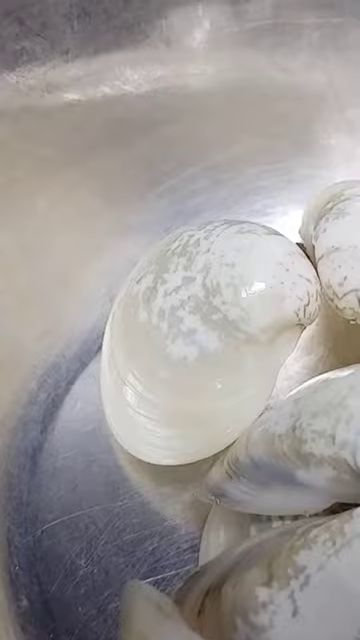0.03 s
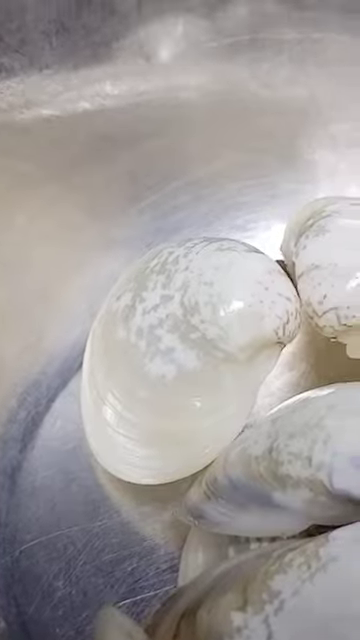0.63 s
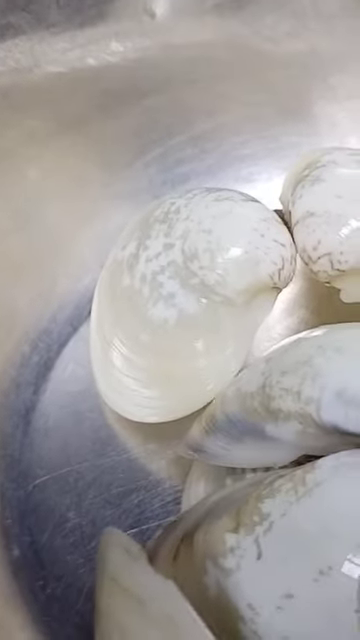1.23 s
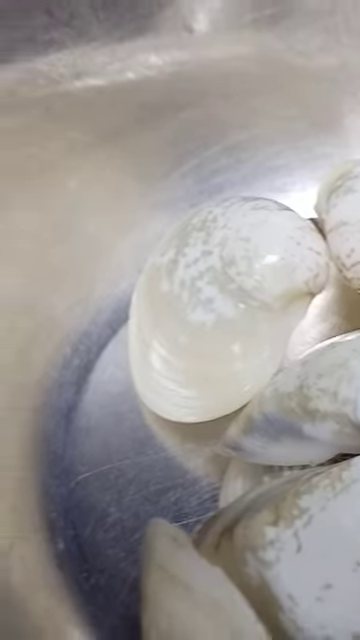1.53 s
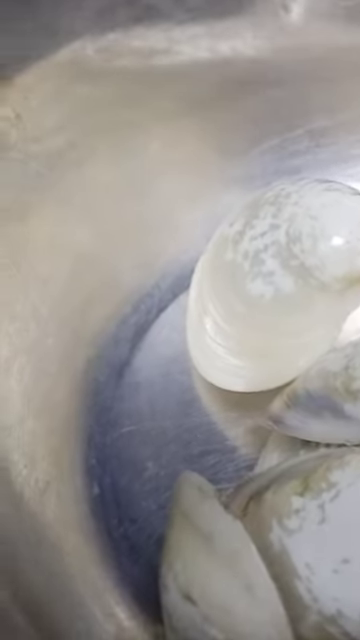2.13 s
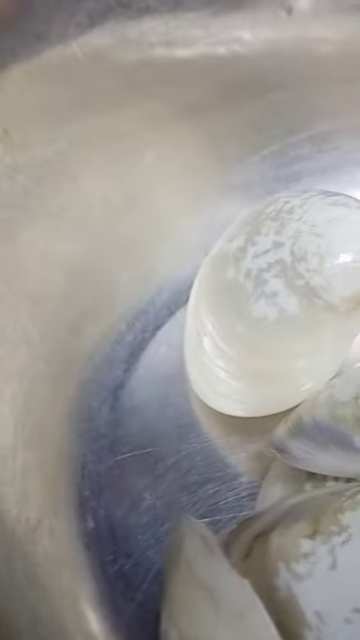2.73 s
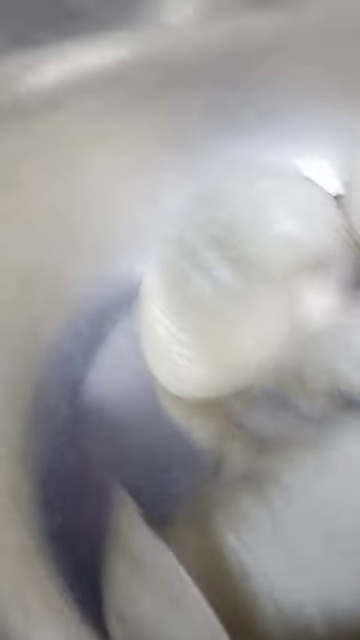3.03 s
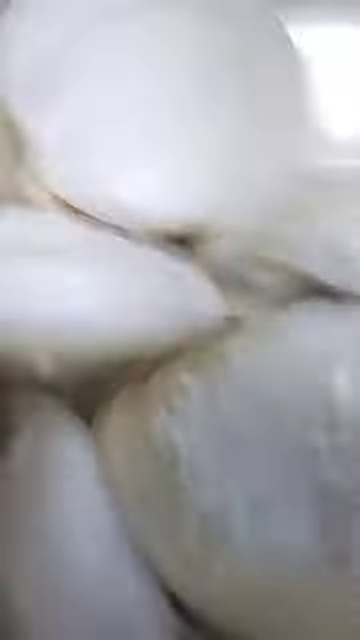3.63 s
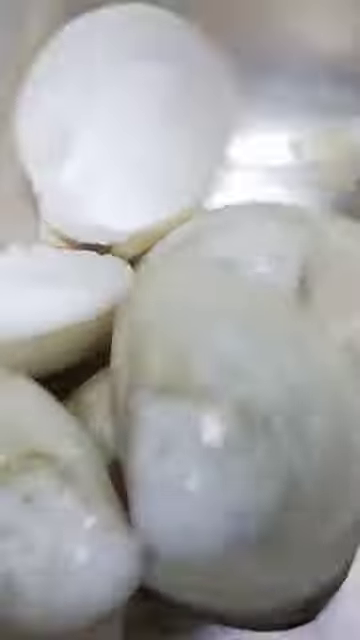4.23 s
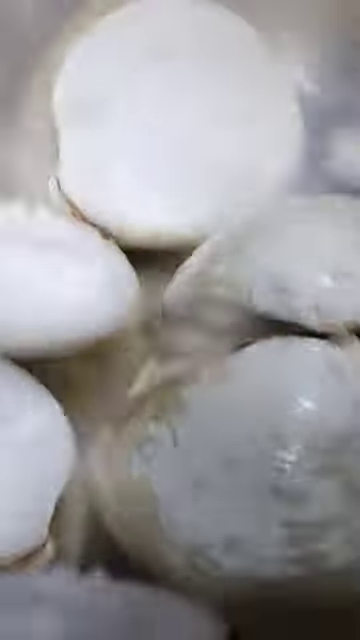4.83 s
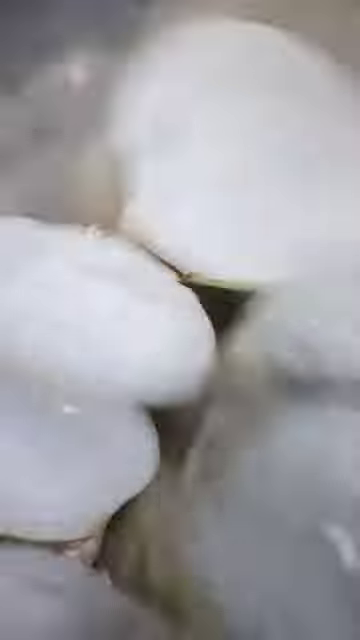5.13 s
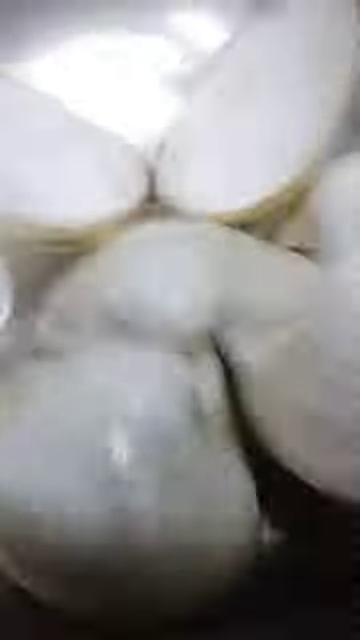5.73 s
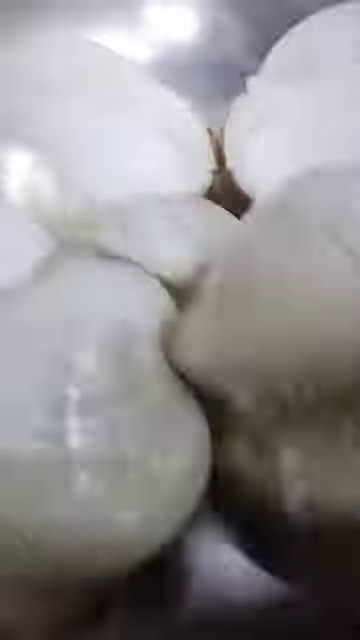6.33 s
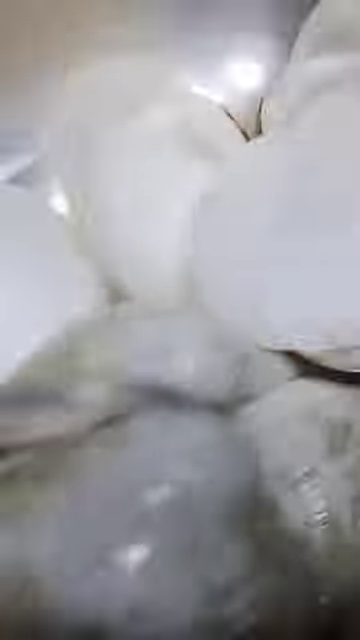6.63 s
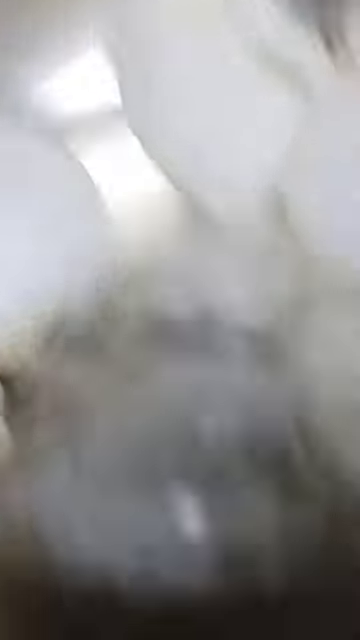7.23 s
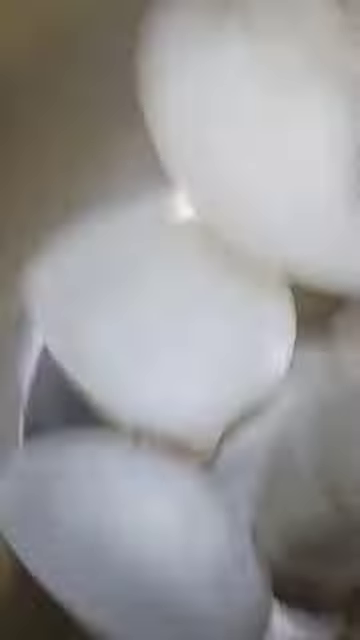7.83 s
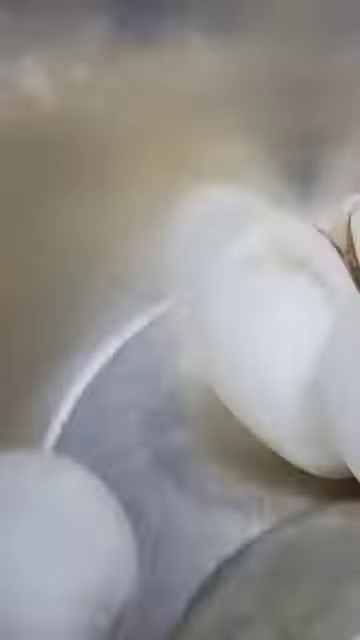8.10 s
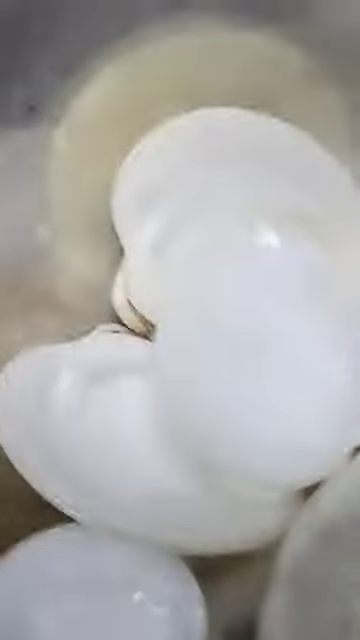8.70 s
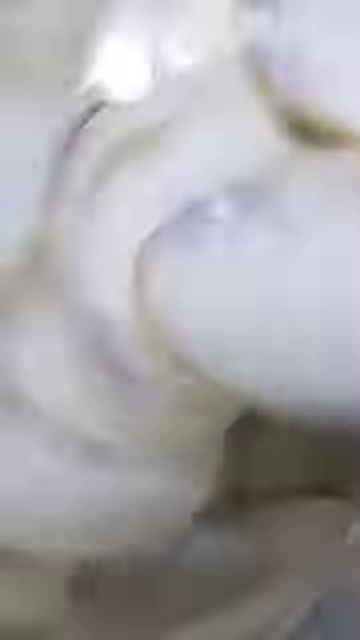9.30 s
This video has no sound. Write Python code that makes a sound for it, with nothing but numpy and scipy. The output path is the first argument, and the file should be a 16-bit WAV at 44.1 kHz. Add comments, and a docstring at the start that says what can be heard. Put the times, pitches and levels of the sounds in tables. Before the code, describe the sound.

Clam shells clatter close up in a steel bowl, knocked, swirled and tossed three times in a small room.

```python
"""Clam shells clatter in a steel bowl: a few taps and a knock, four seconds of swirling, three tosses,
then more swirling. Hundreds of contacts a second ring the shells and the loaded, well damped bowl,
close to a two-port microphone. Fingers brush the steel as the bowl is taken up; each toss pushes
a puff of air. Behind it, in a small, hard room, a clock ticks and an appliance hums faintly."""
import sys
import numpy as np
from scipy import signal
from scipy.fft import rfft, irfft, next_fast_len
from scipy.io import wavfile
from scipy.ndimage import uniform_filter1d

SR = 44100
rng = np.random.default_rng(int(sys.argv[2]) if len(sys.argv) > 2 else 0)


def dump_mix(stems):
    """Bounce the given channels to the path in sys.argv[1] as a 16-bit WAV at rate SR."""
    frames = np.atleast_2d(stems).T  # one column per channel
    limited = np.clip(frames, -1, 1)  # hard clip at full scale
    pcm = np.round(limited * 32767).astype(np.int16)
    wavfile.write(sys.argv[1], SR, pcm)


N = 421596

# Throws of the heap. Each row: start in s, rise in s, top clatter in dB, flight in s,
# landing clatter in dB, air puff in dB.
TOSSES = [(7.478, 0.032, -12.5, .125, -20, -42), (7.902, 0.086, -12, 0.16, -16, -42.5),
          (8.41, 0.073, -12.5, 0.13, -18, -34)]
ROLL_DB = -27.5  # effort of the rolling heap between slides


def amp(db):
    """Decibels to gain."""
    return 10 ** (np.asarray(db) / 20)


def unit(x):
    """x at rms 1."""
    return x / np.sqrt(np.mean(x ** 2) + 1e-20)


def along(points, hz):
    """Interpolate (Hz, value) points on a log axis."""
    f, v = np.transpose(points)
    return np.interp(np.log(hz + 1), np.log(f + 1), v)


def add(track, start_s, sound):
    """Mix a stereo sound into the track."""
    part = track[:, max(round(start_s * SR), 0):][:, :sound.shape[1]]
    part += sound[:, :part.shape[1]]


def filtered(x, response):
    """Apply the gain response(hz) to x."""
    size = next_fast_len(N + 8192, True)
    return irfft(rfft(x, size) * response(np.fft.rfftfreq(size, 1 / SR)), size)[..., :N]


def noise(spectrum):
    """Stereo noise of rms 1, coloured by (Hz, dB) points."""
    return unit(filtered(rng.standard_normal((2, N)), lambda hz: amp(along(spectrum, hz))))


def wobble(knots_per_s):
    """Random curve, linear between Gaussian knots."""
    knots = rng.standard_normal(int(N * knots_per_s / SR) + 2)
    return np.interp(np.arange(N) * knots_per_s / SR, np.arange(len(knots)), knots)


def min_phase_pulse(spectrum, size=1024):
    """The most compact pulse with this (Hz, dB) spectrum."""
    cepstrum = irfft(np.log(amp(along(spectrum, np.fft.rfftfreq(size, 1 / SR)))))
    cepstrum[1:size // 2] *= 2
    cepstrum[size // 2 + 1:] = 0
    return irfft(np.exp(rfft(cepstrum)))


def swells(peaks, spectrum, rise_s, t60_s):
    """Noise bursts that build to each (s, dB) peak and die away."""
    t = np.arange(N) / SR
    level = np.zeros(N)
    for peak_s, db in peaks:
        onset = np.exp(-np.clip((peak_s - t) / rise_s, 0, 10) ** 2)
        level += onset * amp(db - 60 * np.clip(t - peak_s, 0, 2) / t60_s)
    return level * noise(spectrum)


def background(hum_db=-7.5):
    """Room air with the faint hum of an appliance."""
    # Air level. Each row: time in s, level in dB.
    air_levels = [(0, -120), (.23, -120), (.25, -73.5), (.5, -66), (3.2, -63), (7.2, -71), (9, -74)]
    # Air colour. Each row: frequency in Hz, relative density in dB.
    air_spectrum = [(25, -9), (50, -6.5), (95, 0), (135, -19.5), (190, 0.5), (250, -11.5), (300, -6),
                    (400, -15), (900, -14), (1300, -21.5), (1600, -25.5), (3000, -36.5), (15000, -49)]
    # Appliance tones. Each row: frequency in Hz, relative level in dB.
    hum_tones = [(301.5, -75.5), (699.8, -79), (909.8, -82), (1001, -81.5), (1200, -91.5), (1303, -87)]
    t = np.arange(N) / SR
    hum = sum(amp(db) * np.sin(2 * np.pi * hz * t + rng.uniform(0, 2 * np.pi)) for hz, db in hum_tones)
    level = amp(np.interp(t, *np.transpose(air_levels)))
    return level * (noise(air_spectrum) + amp(hum_db) * unit(hum))


def clock():
    """Three soft ticks, a second apart."""
    # Ticks. Each row: time in s, level in dB.
    ticks = [(.592, -56.5), (1.595, -54), (2.595, -55.5)]
    # Tick colour. Each row: frequency in Hz, relative density in dB.
    spectrum = [(300, -16), (1200, -1), (2300, 4), (3900, 13.5), (6500, 0), (8500, -16), (15000, -23)]
    return swells(ticks, spectrum, rise_s=0.022, t60_s=0.29)


def finger_brushes():
    """Fingers slide on the steel with a thin hiss."""
    # Strokes. Each row: time in s, level in dB.
    strokes = [(1.85, -71), (2.21, -67), (2.41, -65), (2.53, -69)]
    # Friction colour. Each row: frequency in Hz, relative density in dB.
    spectrum = [(1000, -21), (5000, -25.5), (6200, -2), (9000, -16.5), (15000, -33)]
    return swells(strokes, spectrum, rise_s=0.02, t60_s=0.27)


def air_puffs(lag_s=0.027):
    """The tossed bowl pushes air: a low puff just after each throw."""
    # Puff colour. Each row: frequency in Hz, relative density in dB.
    spectrum = [(20, -14), (55, -12.5), (110, -10), (250, -11.5), (1000, -69)]
    peaks = [(start_s + rise_s + lag_s, db) for start_s, rise_s, *_, db in TOSSES]
    return swells(peaks, spectrum, rise_s=0.051, t60_s=0.22)


def in_room(x, wet_db, build_s=0.0017):
    """Close, hard walls add a short tail, drawn afresh on each call."""
    # Room decay. Each row: frequency in Hz, T60 in s.
    decay = [(200, 0.13), (600, 0.2), (3000, 0.25), (7000, 0.24), (14000, 0.18)]
    hz, t, spectra = signal.stft(rng.standard_normal((2, SR // 3)), SR, nperseg=256)
    tail = signal.istft(spectra * amp(-60 * t / along(decay, hz)[:, None]), SR, nperseg=256)[1]
    tail *= 1 - np.exp(-(np.arange(tail.shape[1]) / SR / build_s) ** 2)
    tail *= amp(wet_db) / np.linalg.norm(tail[0])
    tail[:, 0] += 1  # direct sound
    return signal.fftconvolve(x, tail, axes=1)


def ports(x):
    """Both ports hear the bowl's low modes together; the right gets more bass and top treble."""
    # Port likeness. Each row: frequency in Hz, left-right correlation.
    likeness = [(60, 0.68), (230, 0.49), (330, 0.56), (480, 0.7), (680, 0.35), (820, 0.42), (1050, -0.12),
                (1350, 0.12), (2000, 0.012), (15000, -0.027)]
    # Port balance. Each row: frequency in Hz, left minus right in dB.
    balance = [(60, -4.5), (400, -7), (800, -1), (1100, -4), (1900, 1.5), (2600, 3), (7900, -.5),
               (8400, -11), (15000, -11)]

    def mid_side_gains(hz):
        angle = np.arccos(np.clip(along(likeness, hz), -1, 1)) / 2
        return np.array([np.cos(angle), np.sin(angle)])

    mid, side = filtered(x, mid_side_gains)
    left_right = np.array([mid + side, mid - side])
    return filtered(left_right, lambda hz: amp(np.outer([.5, -.5], along(balance, hz))))


def ringing(modes, t):
    """Damped modes (Hz, width in Hz, peak in dB), each at its own phase in each port."""
    hz, width_hz, db = np.transpose(modes)[:, :, None]
    phase = rng.uniform(0, 2 * np.pi, (2, len(modes), 1))
    envelope = amp(db) * 2 * np.pi * width_hz / SR * np.exp(-np.pi * width_hz * t)
    return np.sum(envelope * np.sin(2 * np.pi * hz * t + phase), axis=1)


def contact(scrape_t60_s, shell_db, bowl_db, weight_db, sharp_db, own_modes=(), scatter_db=7.5):
    """One shell strikes: its ribbed edge scrapes; shell and bowl ring at strengths set by the spot hit."""
    # Bowl modes. Each row: frequency in Hz, width in Hz, relative peak in dB.
    bowl_modes = [(347.5, 42.3, 6), (661, 26, 4), (793, 120, -1), (1354, 52, 4.5), (1928, 44, 0),
                  (2294, 36, 4.5), (2728, 40, 9), (2983, 27, 4.5), (3627, 57, 7.5), (3835, 37, 9),
                  (4630, 42, 9), (4884, 49, 2), (5774, 38, 7.5), (7057, 57, 7.5), (7383, 61, 5),
                  (7774, 39, 10)]
    # Contact pulse. Each row: frequency in Hz, relative level in dB.
    spectrum = [(40, -29), (100, -18.5), (210, -18), (340, -16.5), (500, -8.5), (740, 2), (1200, -2),
                (1900, -1.5), (2400, -4), (3000, 0.5), (4600, -7), (6100, -5), (8800, -16), (13500, -17.5),
                (15500, -34)]
    t = np.arange(SR // 12) / SR
    scrape = rng.standard_normal((2, len(t))) * amp(-60 * t / scrape_t60_s)
    scrape /= np.linalg.norm(scrape, axis=1, keepdims=True)
    notes_hz = np.geomspace(2000, 13000, 9) * np.exp(.14 * rng.standard_normal(9))
    shell = [(hz, 90 * np.sqrt(hz / notes_hz[0]), shell_db + rng.normal(0, scatter_db))
             for hz in notes_hz]
    bowl = [(hz, width_hz, db + bowl_db + rng.normal(0, scatter_db)) for hz, width_hz, db in bowl_modes]
    tilt = [(340, weight_db), (1200, 0.0035), (3300, 0.012), (7500, sharp_db)]
    pulse = min_phase_pulse([(hz, db + along(tilt, hz)) for hz, db in spectrum])
    return signal.fftconvolve(scrape + ringing(shell + bowl + list(own_modes), t), pulse[None], axes=1)


def slide(start_s, length_s, stop_s, rise_s=0.0092, sag_db_per_s=11):
    """Envelope of one slide: quick rise, slow sag, then the shells come to rest."""
    age_s = np.arange(N) / SR - start_s
    settling = np.exp(-np.maximum(age_s - length_s, 0) / stop_s)
    return np.clip(age_s / rise_s, 0, 1) * amp(-sag_db_per_s * np.abs(age_s)) * settling


def tumbling(swirl_rise_s=0.019, throw_db=7.5, thinning_db_per_s=76.5):
    """The heap's motion per sample: effort as a gain, contact weight in dB, edge sharpness in dB."""
    # Swirls keep the heap rolling. Each row: start in s, end in s.
    swirls = [(3.26, 6.93), (9.06, 14)]
    # Each push sends the heap sliding. Each row: start in s, length in s, effort in dB, weight in dB.
    slides = [(3.288, 0.02, -12.5, -5.5), (3.352, 0.33, -14.5, 0.5), (3.668, 0.24, -15, -3),
              (4.036, 0.16, -15, -2.5), (4.208, 0.16, -15.5, -7), (4.38, 0.16, -17.5, 0.5),
              (4.49, 0.18, -17.5, -5.5), (4.759, 0.074, -22.5, -10), (4.851, .035, -24, 1.5),
              (4.987, 0.088, -17, 2), (5.119, 0.12, -18, 0), (5.313, 0.22, -15, -2), (5.573, 0.24, -19, 2),
              (5.813, 0.17, -20, 2), (6.003, 0.08, -20, 1.5), (6.137, 0.22, -22, 2.5), (6.325, .1, -19, 1),
              (6.449, 0.14, -17.5, 0), (6.614, 0.16, -19, 1), (6.809, 0.086, -20.5, 1.5),
              (7.406, 0.061, -19.5, -5), (9.084, 0.072, -18.5, -1.5), (9.172, .17, -15.5, -6),
              (9.4, 0.14, -15.5, -5.5)]
    toss_weight_db, toss_edge_db = -4, -2.5  # shells in flight meet less sharply
    t = np.arange(N) / SR
    moves = []
    for start_s, end_s in swirls:
        rolling = np.clip((t - start_s) / swirl_rise_s, 0, 1) * (t < end_s)
        moves.append((amp(ROLL_DB) * rolling, 0, 0))
    for start_s, length_s, db, weight_db in slides:
        moves.append((amp(db) * slide(start_s, length_s, stop_s=.005), weight_db, 0))
    # The heap is thrown up, thins out in the air and falls back.
    for start_s, rise_s, top_db, flight_s, landing_db, _ in TOSSES:
        top_s = start_s + rise_s
        drop_db = np.maximum(throw_db * (top_s - t) / rise_s, thinning_db_per_s * (t - top_s))
        throw = amp(top_db - drop_db) * ((t > start_s) & (t < top_s + flight_s))
        landing = amp(landing_db) * slide(top_s + flight_s, length_s=0.055, stop_s=0.0043)
        moves += [(throw, toss_weight_db, toss_edge_db), (landing, toss_weight_db / 2, toss_edge_db)]
    level, weight_db, edge_db = map(np.array, zip(*moves))
    power = level ** 2
    total = power.sum(axis=0) + 1e-14
    return np.sqrt(total), weight_db @ power / total, edge_db @ power / total


def chinks(effort, median_hz=5940, t60_s=0.023, gain_db=-4, scatter_db=2.0, count=480):
    """Thin rims meet with short, bright notes, as strongly as the heap is shaken."""
    t = np.arange(SR // 25) / SR
    track = np.zeros((2, N))
    for i in rng.integers(N, size=count):
        hz = median_hz * np.exp(.2 * rng.standard_normal())
        note = np.sin(2 * np.pi * hz * t + rng.uniform(0, 2 * np.pi, (2, 1)))
        envelope = amp(gain_db + scatter_db * rng.standard_normal() - 60 * t / t60_s)
        add(track, i / SR, effort[i] * envelope * note)
    return track


def knocks(gain_db=18, chatter_s=.011, bounces=3, note_width_hz=45, note_db=15, max_sharp_db=7):
    """A shell lands hard, rings with its strongest note and chatters before it settles."""
    # Hard contacts. Each row: start in s, relative level in dB, weight in dB, sharpness in dB,
    # strongest note in Hz.
    hits = [(1.847, -33.5, 23, -50, 1740), (1.885, -30.5, 40, -29, 370), (2.18, -35.5, 29.5, -16, 850),
            (2.197, -41, 24, -24, 910), (2.231, -34.5, 26.5, -5, 910), (2.268, -45, 8, 11, 5130),
            (2.927, -11, 17.5, -19, 1675), (2.947, -21, -0.5, 7, 1760), (3.236, -27.5, 10.5, -17, 820),
            (3.258, -9, -10.5, -11.5, 2840), (3.273, -1.5, -3.5, -17.5, 1466), (3.347, -6, -9, 7, 1740),
            (3.868, -8, 4.5, -6, 2260), (4.019, -2, -15.5, -12, 2700), (4.274, -0.5, -1.5, -5, 2490),
            (4.511, -3.5, -2, 5.5, 2970), (4.598, -2, -2.5, -2, 2570), (4.753, -4, 5.5, 8.5, 3120),
            (4.85, -0.5, -3, 0, 2790), (4.931, 0, -12, 1.5, 1880), (5.064, -5.5, -1, -7, 2000),
            (5.314, -1, 5, -2.5, 1410), (5.587, 0, -1, 4.5, 5860), (5.688, -2.5, 6.5, -3.5, 965),
            (6.029, 0, -6, -9.5, 2720), (6.126, -2.5, 4.5, 7, 6540), (6.373, -2, -0.5, 3, 2770),
            (6.806, -2.5, 6.5, 2.5, 2880), (6.96, -9.5, 3, 0.5, 3130), (7.002, -19, 2, -11, 2060),
            (7.308, -24.5, 3, -31, 2860), (7.332, -22.5, 8, -17, 2980), (7.349, -14.5, 3.5, -15.5, 1420),
            (7.392, -10, -4, -1.5, 2730), (7.409, -3.5, -3, -4, 1450), (7.496, -1, -0.5, 5, 1330),
            (7.825, -27.5, 11, -31, 1720), (7.897, -8.5, 3.5, -4, 1310), (7.933, -2.5, 6.5, 1, 1870),
            (7.971, -2.5, 8, -5, 1880), (8.263, -19.5, 0, -20.5, 1465), (8.411, -11, 7, -11, 1380),
            (8.449, 1.5, -2.5, -11, 1664), (9.18, -1, -7, 2, 1897)]
    track = np.zeros((2, N))
    for start_s, db, weight_db, sharp_db, hz in hits:
        hit = contact(scrape_t60_s=0.049, shell_db=-13, bowl_db=-4.0, weight_db=weight_db,
                      sharp_db=min(sharp_db, max_sharp_db), own_modes=[(hz, note_width_hz, note_db)])
        landing = hit.copy()
        for lag_s in chatter_s * rng.random(bounces):
            add(landing, lag_s, .5 * hit * rng.choice([-1, 1]))
        landing = in_room(landing / np.linalg.norm(landing), wet_db=-4)
        add(track, start_s, amp(db + gain_db) * landing)
    return track


def shelved(x, weight_db, sharp_db, low_hz=1100, high_hz=7500):
    """Heavy contacts have more bass, sharp ones more treble."""
    low = signal.sosfiltfilt(signal.butter(2, low_hz, fs=SR, output="sos"), x, padtype=None)
    high = signal.sosfiltfilt(signal.butter(2, high_hz, "high", fs=SR, output="sos"), x, padtype=None)
    return x + (amp(weight_db) - 1) * low + (amp(sharp_db) - 1) * high


def clatter(effort, weight_db, edge_db, blows_per_s=560, shells=20, gain_db=1.0, rub_db=-21):
    """The shells tumble: the energy of the shaking is shared among their random contacts."""
    # Ribbed shells sliding over each other. Each row: frequency in Hz, relative density in dB.
    rub_spectrum = [(2000, -15.5), (6000, -9), (9000, 6.5), (15000, -3)]
    uneven_db, size_db, turns_db, hardness_db = 2.08, 5.0, 6, 3.5  # random spreads
    effort = effort * amp(uneven_db * wobble(knots_per_s=35))
    blows = (rng.random(N) < blows_per_s / SR) * amp(size_db * rng.standard_normal(N))
    # Each shell chatters in turn, so its own notes stand out.
    owner = rng.integers(shells, size=N)
    for k in range(shells):
        blows[owner == k] *= amp(turns_db * wobble(knots_per_s=22)[owner == k])
    blows /= np.sqrt(np.abs(uniform_filter1d(blows ** 2, size=700)) + 1e-6)  # even out the power
    blows *= effort * amp(gain_db) * rng.choice([-1, 1], N)
    heap = np.zeros((2, N))
    for k in range(shells):
        own_weight_db, own_sharp_db = rng.normal(0, hardness_db, 2)
        hit = contact(scrape_t60_s=0.026, shell_db=10.0, bowl_db=3.0,
                      weight_db=own_weight_db, sharp_db=own_sharp_db)
        hit = in_room(hit, wet_db=1)
        hit /= np.linalg.norm(hit[0])
        heap += signal.oaconvolve((blows * (owner == k))[None], hit, axes=1)[:, :N]
    heap += effort * amp(rub_db) * noise(rub_spectrum)
    # Harder shaking makes the edges meet more sharply.
    usual_effort_db, usual_sharp_db, sharp_db_per_db = -18.5, 3.5, 0.074
    effort_db = 20 * np.log10(np.maximum(effort, amp(ROLL_DB)))
    sharp_db = edge_db + usual_sharp_db + sharp_db_per_db * (effort_db - usual_effort_db)
    return shelved(heap, weight_db, sharp_db)


def scene():
    """The bowl close by, the air it pushes, the clock and the room behind it."""
    effort, weight_db, edge_db = tumbling()
    bowl = clatter(effort, weight_db, edge_db) + knocks() + chinks(effort) + finger_brushes()
    return ports(bowl) + clock() + air_puffs() + background()


def record(dry):
    """Soft-clip the highest peaks, then low-pass steeply."""
    ceiling, cutoff_hz = .9, 15600
    rounded = dry / (1 + np.abs(dry / ceiling) ** 6) ** (1 / 6)
    return filtered(rounded, lambda hz: 1 / (1 + (hz / cutoff_hz) ** 120))


dry = scene()
out = record(dry)
dump_mix(out)
```